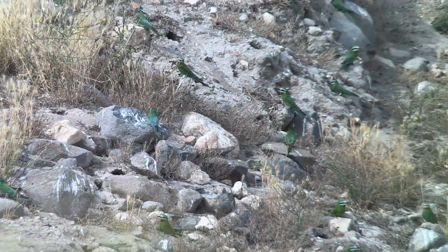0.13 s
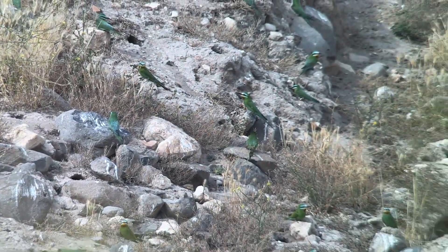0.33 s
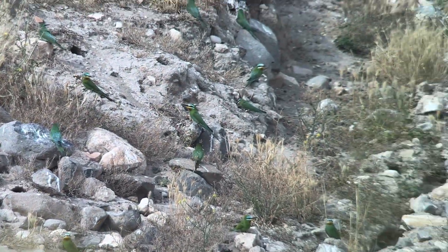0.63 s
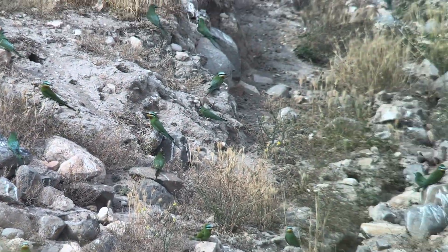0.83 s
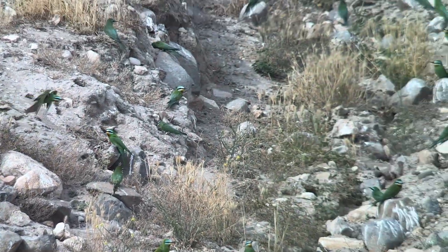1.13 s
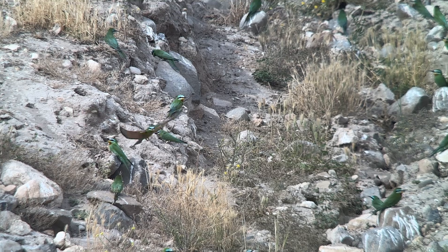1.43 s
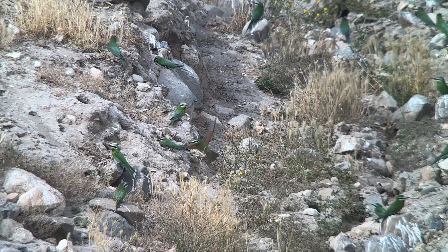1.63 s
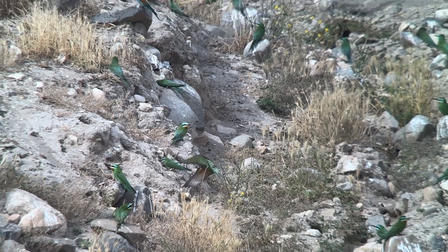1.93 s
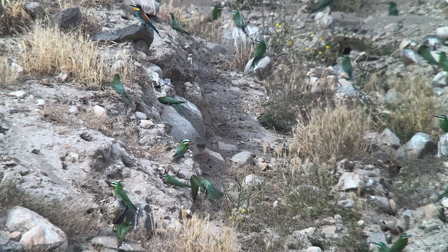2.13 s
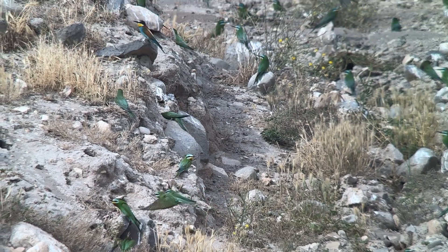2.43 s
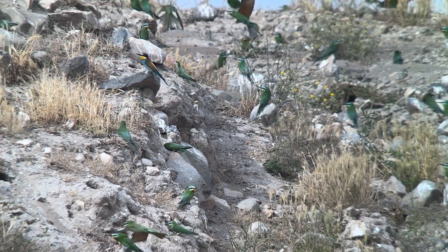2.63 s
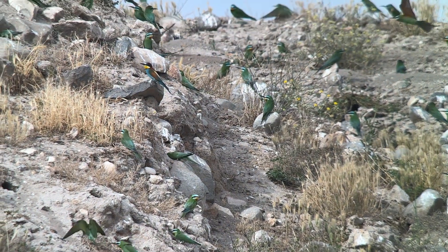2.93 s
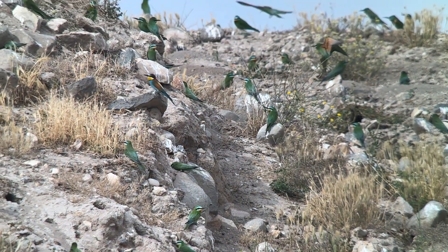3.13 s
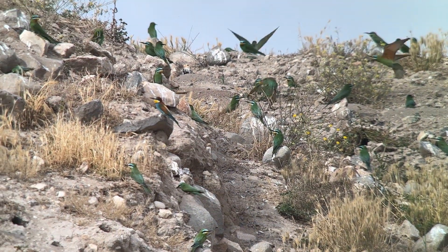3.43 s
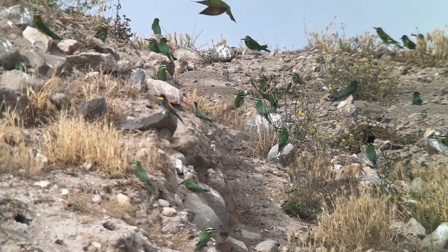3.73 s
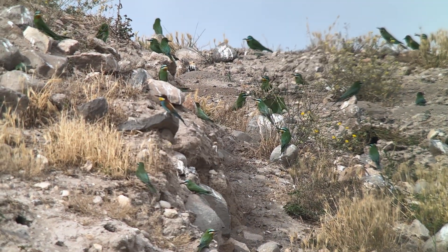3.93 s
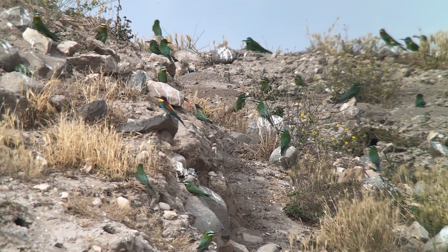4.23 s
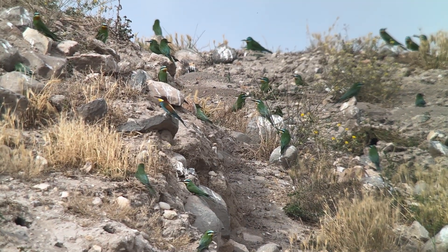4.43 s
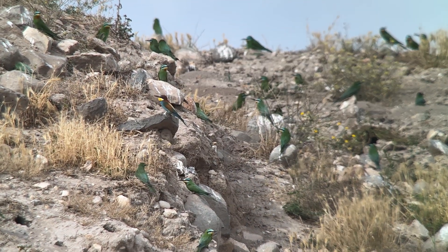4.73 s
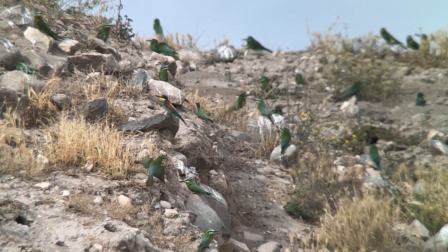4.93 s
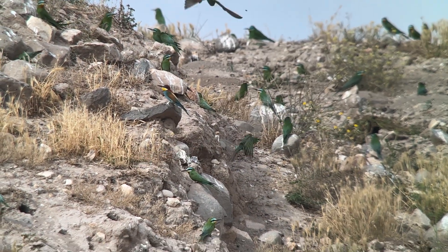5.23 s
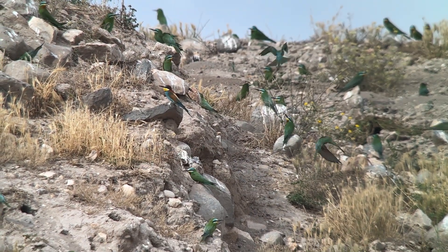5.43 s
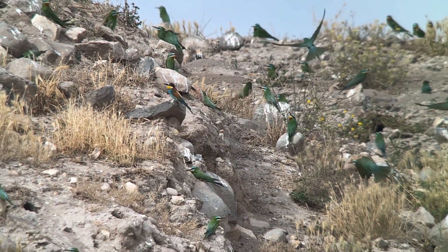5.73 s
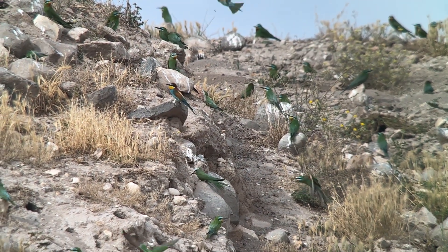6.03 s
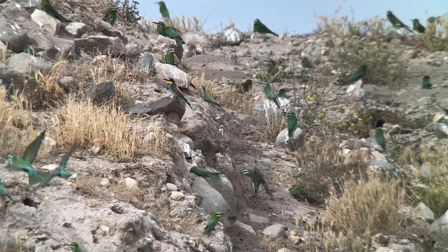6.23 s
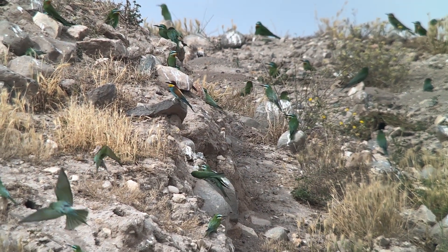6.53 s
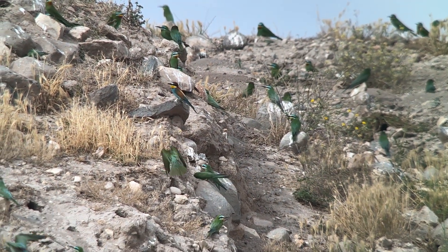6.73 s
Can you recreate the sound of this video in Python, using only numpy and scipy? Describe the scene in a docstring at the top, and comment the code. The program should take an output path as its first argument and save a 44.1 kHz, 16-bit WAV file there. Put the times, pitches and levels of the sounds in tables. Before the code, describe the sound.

Bee-eaters chirp and roll their liquid calls across a rocky slope, a dense colony babbling behind, with cricket chirps and a thin high insect buzz.

```python
"""Bee-eaters call over a colony on a dry, rocky slope: a few close by, dozens farther off, scattered by stones.
Calls are gliding tones with strands of a lower voice and noise echoes; far calls merge into a murmur.
A cricket chirps in tone bursts, a bush-cricket buzzes as scraped noise, a grasshopper ticks in noise bursts.
Wind, puffs and still air are shaped noise; handling bumps are decaying tones; a faint far hum comes and goes."""
import sys
import numpy as np
from scipy import signal
from scipy.fft import rfft, irfft, next_fast_len
from scipy.io import wavfile
from scipy.ndimage import uniform_filter1d

SR = 44100
rng = np.random.default_rng(int(sys.argv[2]) if len(sys.argv) > 2 else 0)


def unload_wav(signal):
    """Save mono or channel-first audio to the path in sys.argv[1] as 16-bit WAV at rate SR, clipped to [-1, 1]."""
    wavfile.write(
        sys.argv[1],
        SR,
        np.round(np.clip(np.atleast_2d(signal).T, -1, 1) * 32767).astype(np.int16),
    )


N = 302967
TIME = np.arange(N) / SR
CALL_TIME = np.arange(-4400, 10000) / SR

# Call gestures, before stretching: [t/s from call time, f/share of top pitch, level/dB relative]
ROLL_GESTURE = [(0, .65, -22), (.010, .8, -5), (.019, 1, -7), (.033, 1, -8), (.039, .78, 0),
                (.052, .71, -3), (.059, .7, -11), (.066, .75, -1), (.078, .77, 2), (.085, .72, -6),
                (.093, .66, -9), (.135, .58, -28)]
CHIP_GESTURE = [(-.045, .66, -26), (-.032, .69, -17), (-.02, .76, -11), (-.012, .85, -9), (-.006, .96, 0),
                (.003, 1, 0), (.009, .98, -7), (.015, .84, -26)]
YELP_GESTURE = [(-.022, .8, -20), (-.01, .93, -8), (0, 1, -1), (.006, .92, 0), (.014, .72, -7),
                (.026, .58, -22)]
SLUR_GESTURE = [(-.09, 1.05, -23), (-.07, 1.11, -15), (-.045, 1.0, -8), (-.02, .89, -3), (0, .81, 0),
                (.025, .73, -3), (.05, .66, -8), (.075, .58, -20)]
PURR_GESTURE = [(-.04, 1.07, -22), (-.02, 1.05, -6), (0, 1, -2), (.02, .96, -7), (.045, .92, -22)]
HOOT_GESTURE = [(-.04, 0.99, -16), (-.01, 0.83, 3.5), (0.016, 1, -2.5), (0.046, 0.63, -12)]
# Full rolling calls of the nearest bird: [t/s, top f/Hz, level/dB]
ROLL_CALLS = [(.918, 4367, -31), (2.992, 4466, -31.5), (4.657, 4506, -29.5)]
# Short rising chips: [t/s, top f/Hz, level/dB]
CHIP_CALLS = [(.054, 4450, -37.5), (.669, 4390, -37.5), (1.243, 3910, -42), (1.402, 4480, -42.5),
              (1.467, 3290, -41), (1.587, 3690, -42.5), (1.632, 4687, -35), (1.803, 4370, -35),
              (1.912, 3740, -40), (4.567, 4650, -45), (4.845, 4530, -36.5), (5.047, 3380, -41),
              (5.413, 4770, -43), (5.954, 4230, -42.5), (6.755, 4480, -42.5)]
# Arched yelps that drop away: [t/s, top f/Hz, level/dB]
YELP_CALLS = [(1.022, 4950, -38.5), (1.378, 4500, -46), (1.96, 4670, -51), (2.35, 5300, -53.5),
              (2.592, 5140, -50.5), (4.944, 4910, -43.5)]
# Falling slurs from farther up the slope: [t/s, top f/Hz, level/dB]
SLUR_CALLS = [(.41, 4510, -49.5), (.495, 4526, -45), (.755, 4166, -53.5), (2.01, 3864, -43.5),
              (2.265, 4295, -49.5), (2.44, 4460, -50.5), (2.635, 4140, -47.5), (3.15, 4270, -46.5),
              (3.605, 4235, -43.5), (3.745, 4350, -47.5), (3.845, 4350, -45), (4.32, 4855, -49),
              (4.435, 4205, -46), (5.14, 3940, -51), (5.305, 4740, -46.5), (5.365, 3936, -44.5),
              (5.61, 4484, -49), (5.76, 4210, -48), (6.19, 4486, -45.5), (6.33, 3750, -50.5),
              (6.6, 4300, -47.5)]
# Harsh, high squabbling notes: [t/s, top f/Hz, level/dB]
RASP_CALLS = [(.148, 5310, -47.5), (.285, 4920, -46.5), (.817, 5780, -46.5), (.913, 5710, -47),
              (1.18, 4640, -44), (2.09, 5520, -50.5), (5.239, 5620, -50.5), (5.74, 4570, -51),
              (6.13, 4170, -46.5), (6.268, 5270, -43), (6.42, 5600, -47.5), (6.545, 5850, -49.5),
              (6.6, 5640, -44)]
# Low, gently falling purrs: [t/s, f/Hz, level/dB]
PURR_CALLS = [(.02, 2560, -48), (1.74, 2620, -54), (2.4, 2570, -48), (2.655, 2670, -51),
              (5.31, 2610, -48.5), (5.895, 2570, -51), (6.04, 2440, -49), (6.51, 2590, -53.5)]
# Thin, very high squeaks: [t/s, f/Hz, level/dB]
SQUEAK_CALLS = [(2.58, 10400, -71), (3.03, 13900, -70)]
# Hiss in a harsh call: [f/Hz, level/dB relative, per Hz]
HISS_COLOUR = [(2300, -55), (5000, 9), (6500, -3), (9000, -5), (15000, -15)]
# Level of the rest of the colony: [t/s, level/dB]
COLONY_LEVEL = [(0, -55), (.35, -53.5), (.58, -56), (.8, -52), (1.55, -51.5), (2.02, -50.5), (2.15, -57.5),
                (2.4, -54.5), (2.52, -56), (2.7, -55), (3.32, -55.5), (3.55, -53), (3.97, -58.5),
                (4.25, -56), (4.75, -51.5), (4.9, -59), (5.35, -51), (5.55, -56), (6.05, -59.5),
                (6.55, -50.5), (6.7, -54)]
# Colour of the colony's babble after its way across the slope: [f/Hz, gain/dB relative]
BABBLE_COLOUR = [(1400, -14), (2300, 4), (3400, -2), (5000, 0.5), (7000, 7)]
# Farthest, merged voices: [f/Hz, level/dB relative, per Hz]
MURMUR_COLOUR = [(1350, -32), (1700, 0), (2100, 8), (3500, 3), (5300, 2), (7000, -18)]
# Cricket chirps: [first stroke t/s, strokes/count, level/dB]
CHIRPS = [(.222, 9, -49), (0.886, 9, -50), (1.565, 8, -49.5), (2.103, 8, -49.5), (2.65, 9, -49),
          (3.443, 8, -50), (4.032, 9, -49.5), (4.601, 9, -48.5), (5.238, 8, -47.5), (5.766, 9, -44.5),
          (6.386, 10, -46.5)]
# One closing of the cricket's wings, before stretching: [t/s, f/share of pitch, level/dB relative]
STROKE_GESTURE = [(-.011, 1.0, -20), (-.0065, 1.012, -4), (-.002, 1.003, 0), (.002, .993, -1),
                  (.006, .975, -8), (.012, .94, -16), (.019, .91, -25)]
# Bush-cricket's colour: [f/Hz, level/dB relative, per Hz]
BUZZ_COLOUR = [(6500, -64), (7900, -9), (8600, 0), (9040, 0), (9400, -3), (10150, -2), (10800, -2.5),
               (11400, -6), (12300, -19.5), (15500, -24)]
# Colour of ticks and snaps: [f/Hz, level/dB relative, per Hz]
CLICK_COLOUR = [(4500, -7.5), (6000, 7), (7700, -3.5), (8800, -14.5), (13500, -21.5), (15000, -30)]
# Dry snaps: [t/s, level/dB]
SNAPS = [(3.198, -44.5), (3.264, -58)]
# Handling bumps: [t/s, f/Hz, peak level/dB]
BUMPS = [(5.105, 93, -49), (5.155, 94, -50), (5.157, 340, -54), (5.199, 374, -55.5), (5.222, 353, -50),
         (6.429, 91.5, -50), (6.427, 347, -53.5)]
# Soft puffs of air from gusts and passing wings: [t/s, length/s, level/dB, upper edge f/Hz]
PUFFS = [(3.193, 0.041, -53.5, 160), (3.252, 0.048, -54, 134), (3.608, 0.19, -65, 855),
         (4.537, 0.012, -65, 590), (5.094, 0.018, -55.5, 300), (5.239, 0.16, -62.5, 262),
         (6.427, 0.069, -54.5, 184)]
# Wind on the microphone: [t/s, level/dB]
WIND_LEVEL = [(0.0, -70.5), (0.62, -84), (0.8, -65), (1.76, -74), (2.79, -72), (3.6, -60), (4.7, -62.5),
              (6.87, -62)]
# Wind's colour: [f/Hz, level/dB relative, per Hz]
WIND_COLOUR = [(25, -54), (45, -14.5), (62, 0.5), (100, -1.5), (150, -9.5), (360, -14), (540, -28),
               (800, -46)]
# Open air: [f/Hz, level/dB relative, per Hz]
AIR_COLOUR = [(60, -9.5), (120, -5.5), (320, -1), (480, -7.5), (650, -7), (850, -3.5), (1030, 1),
              (1300, -15.5), (2000, 3.5), (7000, -26), (12000, -22.5), (15500, -37)]

CUTOFF_HZ = 15700
# Voice: approximate fundamental at the top of a call; the throat passes little below its low edge
VOICE_HZ, THROAT_LOW_HZ = 1100, 2600
# Roll within a call: nominal rate, and level that follows the pitch ripple
RIPPLE_HZ, RIPPLE_DB_PER_SHARE = 33, 55
PLAIN_CALL_HZ = 4500  # a call here has its plain length; lower ones can last longer
HOOT_START_S, HOOT_GAP_S, HOOT_HZ, HOOT_DB, HOOT_FADE_DB = 1.35, 0.15, 680, -67, 1.5
MURMUR_DB = -66
STROKE_GAP_S, CRICKET_HZ, SOFT_START_DB = .02735, 5690, 1.5
BUZZ_DB, REST_DB, RETURN_DB = -65, -84.5, -63
BUZZ_ATTACK_S, BUZZ_STOP_S, BUZZ_RELEASE_S = 0.036, 2.03, 0.041
BUZZ_RESTART_S, BUZZ_SWELL_S = 4.35, 1
TICK_START_S, TICK_GAP_S, TICK_SLOWING_S, TICK_DB = 2.7945, .0325, .00022, -57
BUMP_RISE_S = 0.0066
HUM_DB, HUM_START_S, HUM_ATTACK_S, HUM_FADE_S, HUM_FADE_DB_PER_S = -62.5, 3.25, 0.35, 3.8, 4


def from_db(db):
    """Decibels to gain."""
    return 10 ** (np.asarray(db) / 20)


def rms_one(x):
    """Scale to an rms of 1."""
    return x / np.sqrt(np.mean(x ** 2) + 1e-20)


def crest_one(x):
    """Scale so that the loudest 10 ms have an rms of 1."""
    return x / np.sqrt(uniform_filter1d(x ** 2, size=441).max() + 1e-20)


def level(rows):
    """Gain over time from rows of (s, dB)."""
    return from_db(np.interp(TIME, *np.transpose(rows)))


def add(out, sound, start_s):
    """Mix a sound in, trimmed to the scene."""
    at = int(round(start_s * SR))
    skip, end = max(-at, 0), min(len(sound), N - at)
    if end > skip:
        out[at + skip:at + end] += sound[skip:end]


def colour(x, points):
    """Filter by a spectrum interpolated over octaves, falling steeply beyond its ends; rms 1."""
    size = next_fast_len(len(x))
    hz, db = np.transpose(points)
    octaves = np.log2(np.maximum(np.fft.rfftfreq(size, 1 / SR), 1))
    outside = np.abs(octaves - np.clip(octaves, np.log2(hz[0]), np.log2(hz[-1])))
    gain = from_db(np.interp(octaves, np.log2(hz), db) - 30 * outside)
    return rms_one(irfft(rfft(x, size) * gain, size)[:len(x)])


def waver(t, rate_hz):
    """Random wandering through this many knots a second; spread near 1."""
    knots = rng.standard_normal(2048)
    return np.interp((t - t[0]) * rate_hz, np.arange(len(knots)), knots)


def whistle(gesture, top_hz, rough, overtone_db, burr=0, ripple=0, stretch=1):
    """Tone along a gesture, rolled and shaken; with a burr, the strongest harmonic of a lower voice."""
    s, share, db = np.transpose(gesture)
    sounding = (CALL_TIME >= s[0] * stretch) & (CALL_TIME <= s[-1] * stretch)
    t = CALL_TIME[sounding] / stretch
    shake = waver(t, 260) + waver(t, 1100)
    ripple_hz = RIPPLE_HZ * rng.uniform(.8, 1.25)
    roll = ripple * np.sin(2 * np.pi * (ripple_hz * t + rng.random()))
    hz = top_hz * np.interp(t, s, share) * (1 + roll + rough * shake)
    phase = 2 * np.pi * np.cumsum(hz) / SR
    loudness = from_db(np.interp(t, s, db) + RIPPLE_DB_PER_SHARE * roll)
    loudness = loudness * signal.windows.tukey(len(t), .1)
    trill = from_db(2.5 * waver(t, 220) * min(rough / .015, 1))
    main = max(round(top_hz / VOICE_HZ), 2) if burr else 1
    below = 0
    for k in range(2, main):
        throat = 1 / (1 + (THROAT_LOW_HZ * main / (k * hz)) ** 12)
        below = below + burr ** (main - k) * np.sin(k / main * phase + k * k) * throat
    above = 0
    for k in range(main + 1, main + 4):
        if k * top_hz / main < CUTOFF_HZ:
            above = above + ((main + 1) / k) ** 2 * np.sin(k / main * phase + k * k)
    out = np.zeros(len(CALL_TIME))
    out[sounding] = loudness * trill * (np.sin(phase) + below + from_db(overtone_db) * above)
    return out


def slope(x, near_db, far_db):
    """Stones by the caller scatter it at once; the hillside answers with a longer tail."""
    t = np.arange(SR // 3) / SR
    stones, hillside = rng.standard_normal((2, len(t)))
    stones = stones * from_db(-60 * t / 0.12) * (t > .001)
    hillside = hillside * from_db(-60 * t / 0.55) * (1 - np.exp(-t / 0.008))
    echo = from_db(near_db) * stones / np.linalg.norm(stones)
    echo = echo + from_db(far_db) * hillside / np.linalg.norm(hillside)
    return x + signal.fftconvolve(x, echo)[:len(x)]


def calls(table, gesture, rough, burr, overtone_db, near_db, far_db, ripple=0, hiss_db=-80, drawl=0):
    """One kind of call: tone plus hiss under its envelope, each with its own echoes; drawl lengthens low ones."""
    out = np.zeros(N)
    for s, top_hz, db in table:
        stretch = (PLAIN_CALL_HZ / top_hz) ** drawl
        tone = whistle(gesture, top_hz, rough, overtone_db, burr, ripple, stretch)
        envelope = np.sqrt(uniform_filter1d(tone ** 2, size=60).clip(0))
        hiss = colour(rng.standard_normal(len(tone)), HISS_COLOUR) * envelope
        call = slope(tone + from_db(hiss_db) * hiss, near_db, far_db)
        add(out, from_db(db) * crest_one(call), s + CALL_TIME[0])
    return out


def rolls():
    """Nearest bird: rolling pitch, almost pure tone."""
    return calls(ROLL_CALLS, ROLL_GESTURE, rough=.015, burr=.06, overtone_db=-29,
                 near_db=-6, far_db=-17, hiss_db=-38)


def chips():
    """Short rising tones with strong lower strands; low ones last longer."""
    return calls(CHIP_CALLS, CHIP_GESTURE, rough=.014, burr=.45, overtone_db=-21,
                 near_db=-7, far_db=-17, hiss_db=-24, drawl=.7)


def yelps():
    """Arched tones that drop away."""
    return calls(YELP_CALLS, YELP_GESTURE, rough=.015, burr=.3, overtone_db=-19, near_db=-6, far_db=-14)


def slurs():
    """Rippled falling tones, strongly scattered on their way down the slope."""
    return calls(SLUR_CALLS, SLUR_GESTURE, rough=.024, burr=.25, overtone_db=-29,
                 near_db=-1, far_db=-13, ripple=.05)


def rasps():
    """Squabbling: shaken chips, harsh with strands and hiss."""
    return calls(RASP_CALLS, CHIP_GESTURE, rough=.025, burr=.6, overtone_db=-13,
                 near_db=-3, far_db=-13, hiss_db=-12)


def purrs():
    """Low, rippled, gently falling tones."""
    return calls(PURR_CALLS, PURR_GESTURE, rough=.016, burr=.1, overtone_db=-24,
                 near_db=-2, far_db=-9, ripple=.025)


def squeaks():
    """Thin, very high tones on the purr's gesture, without lower strands."""
    return calls(SQUEAK_CALLS, PURR_GESTURE, rough=.02, burr=0, overtone_db=-60, near_db=-4, far_db=-12)


def hoots(count=5):
    """A far bird repeats one low note evenly, each time more faintly."""
    notes = []
    for k in range(count):
        hz = HOOT_HZ * rng.normal(1, 0.0213)
        notes.append((HOOT_START_S + k * HOOT_GAP_S, hz, HOOT_DB - k * HOOT_FADE_DB))
    return calls(notes, HOOT_GESTURE, rough=0.051, burr=0, overtone_db=-11, near_db=-6, far_db=-10)


def colony(count=600):
    """Distant calls overlap and swell together; the farthest merge into a steady noise murmur."""
    groups = np.zeros((7, N))
    # (gesture, lowest and highest top f/Hz, ripple/share)
    kinds = (
        (ROLL_GESTURE, 3500, 5300, .05),
        (PURR_GESTURE, 2200, 2900, .02),
        (SLUR_GESTURE, 3400, 4900, .06),
        (PURR_GESTURE, 3700, 4900, .05),
        (CHIP_GESTURE, 2800, 5000, .03),
    )
    for k, (when, pitch, pace, far) in enumerate(rng.random((count, 4))):
        gesture, low_hz, high_hz, ripple = kinds[k % len(kinds)]
        call = whistle(gesture, low_hz + pitch * (high_hz - low_hz), rough=.024, overtone_db=-27,
                       burr=.25, ripple=ripple, stretch=.5 + .45 * pace)
        start_s = (k + when) / count * (N / SR + .2) - .25
        add(groups[k % len(groups)], from_db(-9 * far) * call, start_s)
    voices = np.zeros(N)
    for group in groups:
        # the long path through warm air makes each group flutter
        voices += slope(group, near_db=-1, far_db=-13) * from_db(4.5 * waver(TIME, 90))
    voices = colour(voices, BABBLE_COLOUR)
    voices = voices / np.sqrt(uniform_filter1d(voices ** 2, size=4000) + 1e-9)
    murmur = from_db(MURMUR_DB) * colour(rng.standard_normal(N), MURMUR_COLOUR)
    return level(COLONY_LEVEL) * voices + murmur


def cricket():
    """Evenly spaced wing strokes, each a short tone sagging in pitch; a chirp starts a little softly."""
    out = np.zeros(N)
    for first_s, strokes, chirp_db in CHIRPS:
        for k in range(int(round(strokes))):
            stroke = whistle(STROKE_GESTURE, CRICKET_HZ, rough=.006, overtone_db=-30,
                             stretch=rng.uniform(.85, 1.1))
            db = chirp_db - SOFT_START_DB * np.exp(-k) + rng.normal(0, 1.0)
            add(out, from_db(db) * crest_one(stroke), first_s + k * STROKE_GAP_S + CALL_TIME[0])
    return slope(out, near_db=-8, far_db=-16)


def buzz_effort():
    """Bush-cricket gain: a steady bout, a rest, then a bout that swells back, quickly at first."""
    attack = np.minimum(TIME / BUZZ_ATTACK_S, 1)
    first = attack * np.exp(-np.maximum(TIME - BUZZ_STOP_S, 0) / BUZZ_RELEASE_S)
    second = 1 - np.exp(-np.maximum(TIME - BUZZ_RESTART_S, 0) / BUZZ_SWELL_S)
    return from_db(REST_DB) + from_db(BUZZ_DB) * first + from_db(RETURN_DB) * second


def bush_cricket(stroke_hz=53.8, accent=1.4, sharpness=12.0, sway=0.085, teeth_hz=9500, ring_db=-8, ground_db=-7):
    """File scraped to and fro: the tooth rate swings with each stroke, which has one sharp accent."""
    pace_hz = stroke_hz * (1 + 0.0118 * waver(TIME, 1.3) + 0.0223 * waver(TIME, 90))
    swing = np.cos(2 * np.pi * np.cumsum(pace_hz) / SR)
    accents = accent * np.exp(sharpness * (swing - 1)) * from_db(2.3 * waver(TIME, 43))
    pressure = 1 + sway * swing + accents
    tooth_rate_hz = teeth_hz * (1 - 0.066 * swing + 0.078 * waver(TIME, 900))
    ring = np.sin(2 * np.pi * np.cumsum(tooth_rate_hz) / SR)
    teeth = rng.standard_normal(N) + from_db(ring_db) * ring
    buzz = teeth * pressure * from_db(2.55 * waver(TIME, 280))
    # ground reflection, 122 samples late, combs the hiss into steady bands
    buzz = buzz + from_db(ground_db) * np.roll(buzz, 122)
    return buzz_effort() * colour(buzz, BUZZ_COLOUR)


def clicks(table, decay_s, tail_db):
    """Dry noise bursts that swell quickly and die, with a short scatter behind them."""
    out, t = np.zeros(N), np.arange(SR // 12) / SR
    lead = SR // 200  # silent samples ahead, room for the filter
    for s, db in table:
        envelope = t / decay_s * np.exp(1 - t / decay_s) + from_db(tail_db) * np.exp(-t / 0.03)
        burst = np.pad(rng.standard_normal(len(t)) * envelope, (lead, 0))
        add(out, from_db(db) * crest_one(colour(burst, CLICK_COLOUR)), s - lead / SR)
    return out


def grasshopper(count=12):
    """Run of equally strong soft ticks; each gap is longer than the last."""
    k = np.arange(count)
    times = TICK_START_S + TICK_GAP_S * k + TICK_SLOWING_S * k ** 2 / 2
    return clicks([(s, TICK_DB) for s in times], decay_s=.0006, tail_db=-24)


def snaps():
    """Dry snaps: click bursts with a slower decay than the ticks."""
    return clicks(SNAPS, decay_s=.003, tail_db=-22)


def bumps():
    """Handling bumps: each sets a low note of the microphone's housing ringing for a moment."""
    out, t = np.zeros(N), np.arange(SR // 8) / SR
    swell = t / BUMP_RISE_S * np.exp(1 - t / BUMP_RISE_S)
    for s, hz, db in BUMPS:
        add(out, from_db(db) * swell * np.sin(2 * np.pi * hz * t), s)
    return out


def puffs():
    """Low noise under a bell-shaped swell, each puff with its own upper edge."""
    out = np.zeros(N)
    middle_s = CALL_TIME.mean()
    for s, length_s, db, edge_hz in PUFFS:
        noise = rng.standard_normal(len(CALL_TIME))
        air = colour(noise, [(60, 0), (edge_hz, 0), (3 * edge_hz, -22)])
        swell = np.exp(-(2 * (CALL_TIME - middle_s) / length_s) ** 2)
        add(out, from_db(db) * air * swell, s + CALL_TIME[0] - middle_s)
    return out


def wind():
    """Lumpy low noise of wind on the microphone."""
    noise = rng.standard_normal(N) * from_db(2.6 * waver(TIME, 22))
    return level(WIND_LEVEL) * colour(noise, WIND_COLOUR)


def still_air():
    """Shaped noise of open air, gently uneven, at -65 dB rms."""
    noise = rng.standard_normal(N) * from_db(1.94 * waver(TIME, 14))
    return from_db(-65.0) * colour(noise, AIR_COLOUR)


def hum():
    """Distant wavering sine that swells, holds and fades."""
    hz = 115 * (1 + 0.0145 * waver(TIME, 2.7))
    attack = np.clip((TIME - HUM_START_S) / HUM_ATTACK_S, 0, 1)
    fade_db = HUM_FADE_DB_PER_S * np.maximum(TIME - HUM_FADE_S, 0)
    swell = attack * from_db(HUM_DB - fade_db)
    return swell * np.sqrt(2) * np.sin(2 * np.pi * np.cumsum(hz) / SR)


def scene():
    """Birds near and far, insects and air, in one channel."""
    birds = rolls() + chips() + yelps() + slurs() + rasps() + purrs() + squeaks() + hoots() + colony()
    insects = cricket() + bush_cricket() + grasshopper()
    background = snaps() + bumps() + puffs() + wind() + still_air() + hum()
    return (birds + insects + background)[None]


def record(dry):
    """Steep elliptic low-pass cuts the top."""
    return signal.sosfilt(signal.ellip(10, .1, 70, CUTOFF_HZ, fs=SR, output="sos"), dry)


dry = scene()
out = record(dry)
unload_wav(out)
```